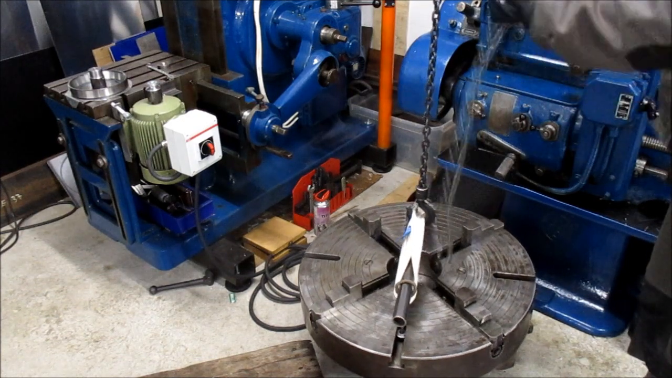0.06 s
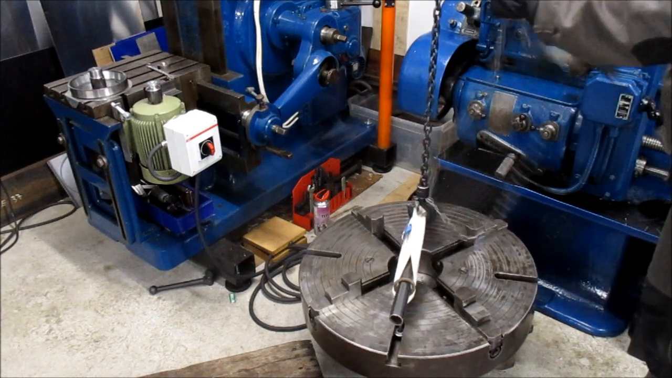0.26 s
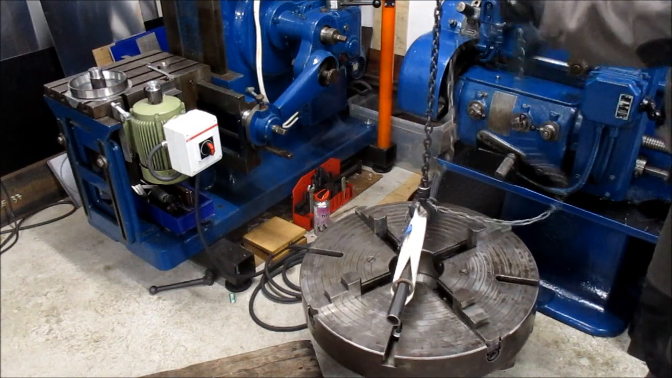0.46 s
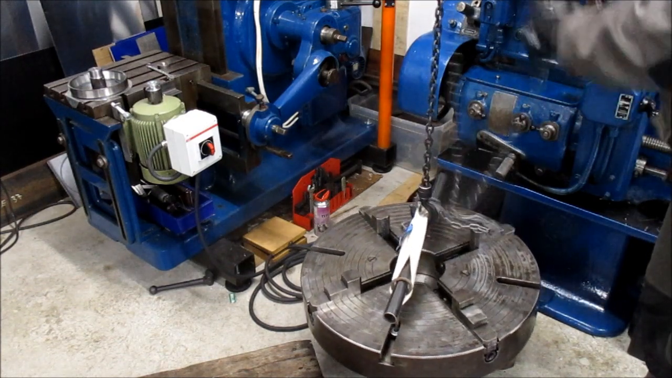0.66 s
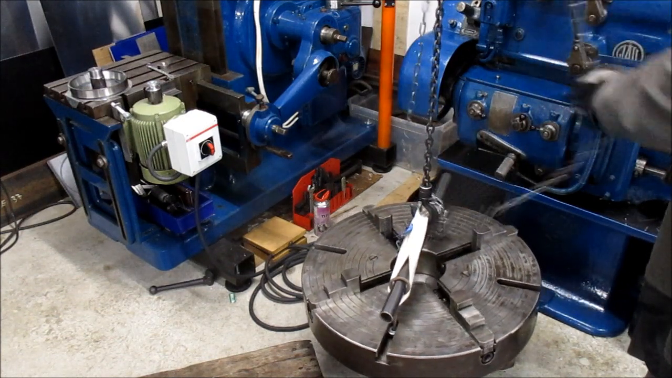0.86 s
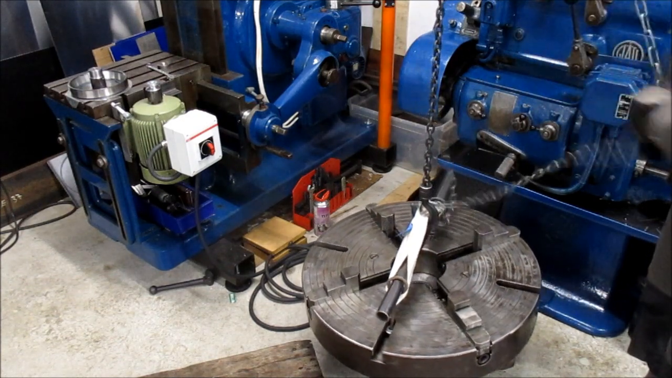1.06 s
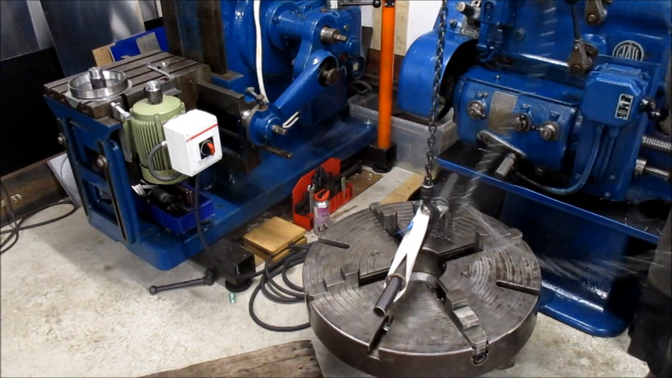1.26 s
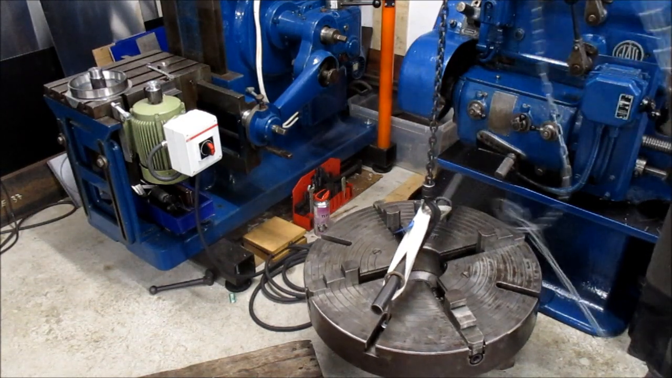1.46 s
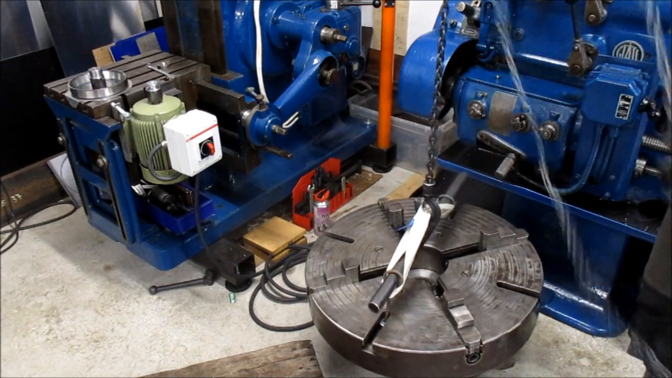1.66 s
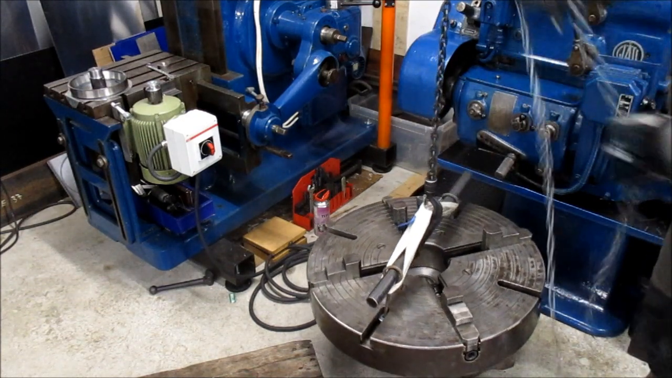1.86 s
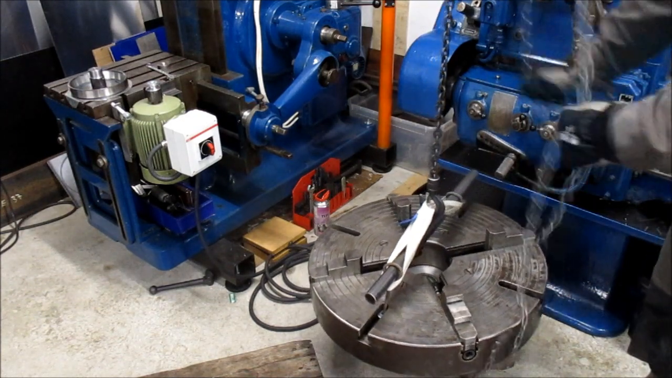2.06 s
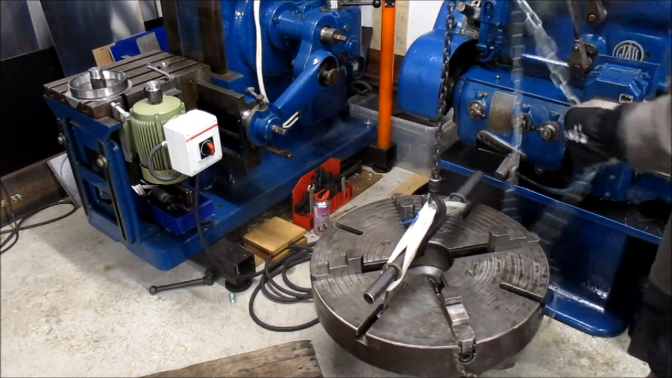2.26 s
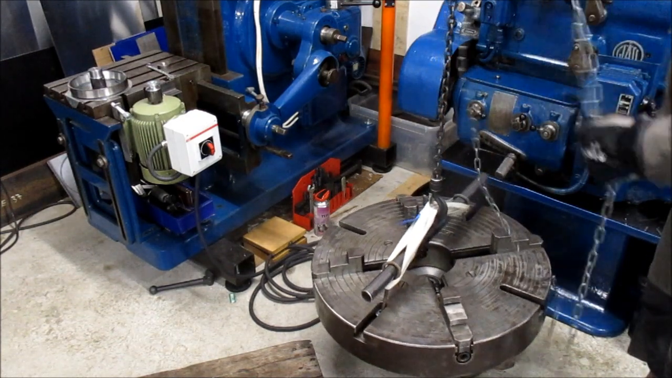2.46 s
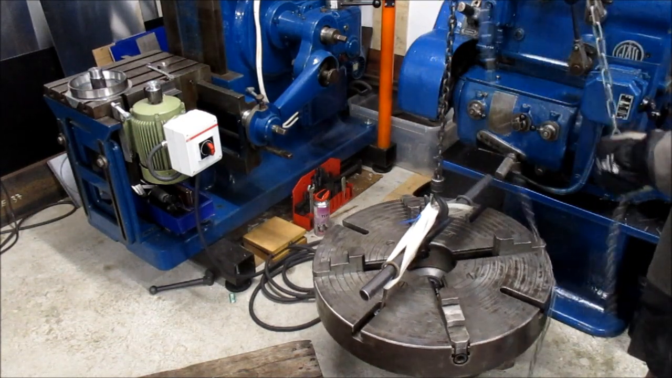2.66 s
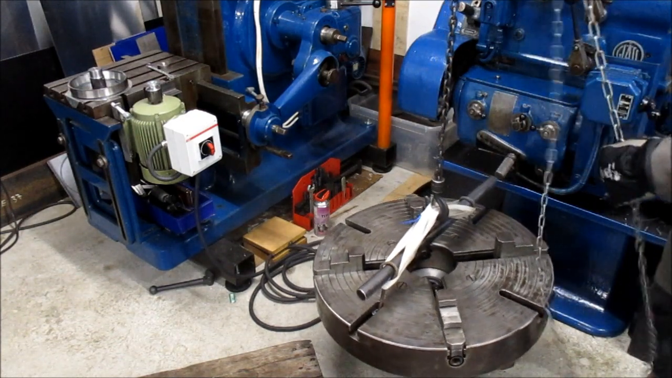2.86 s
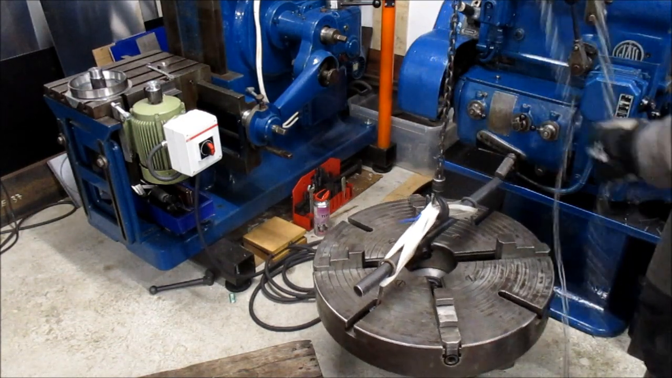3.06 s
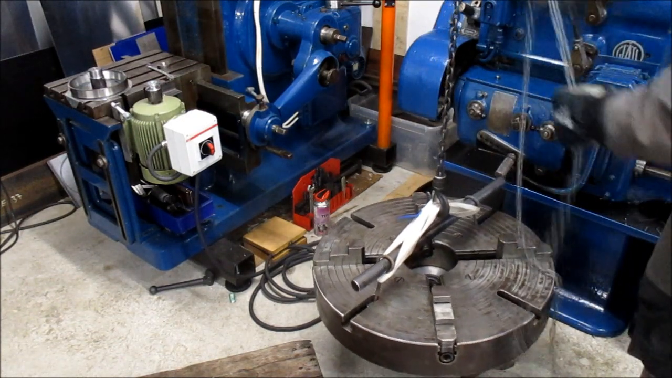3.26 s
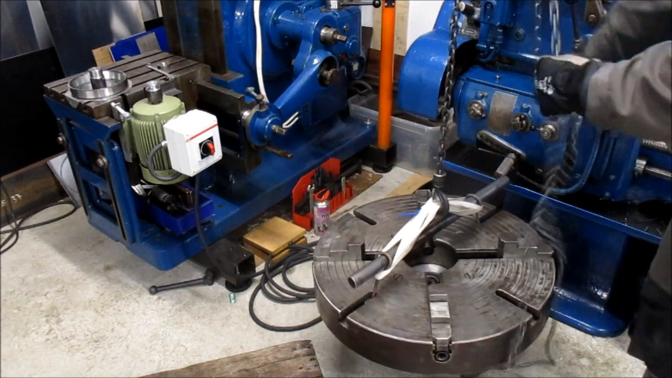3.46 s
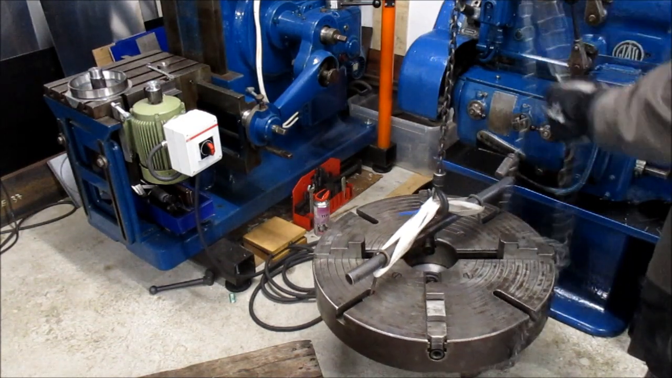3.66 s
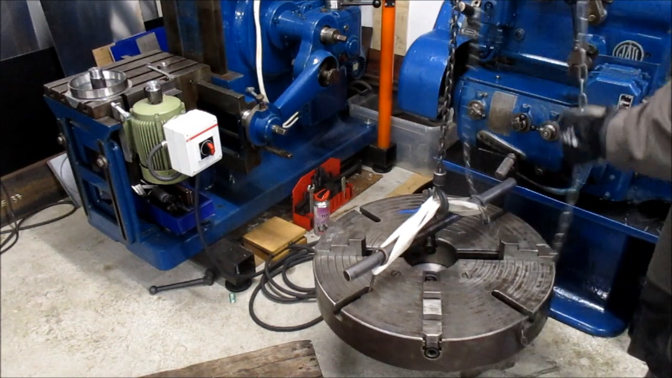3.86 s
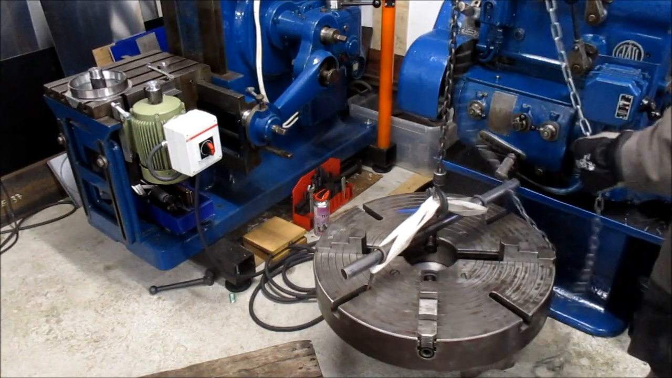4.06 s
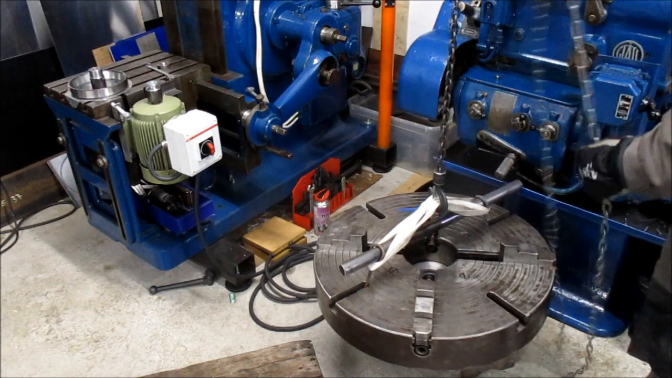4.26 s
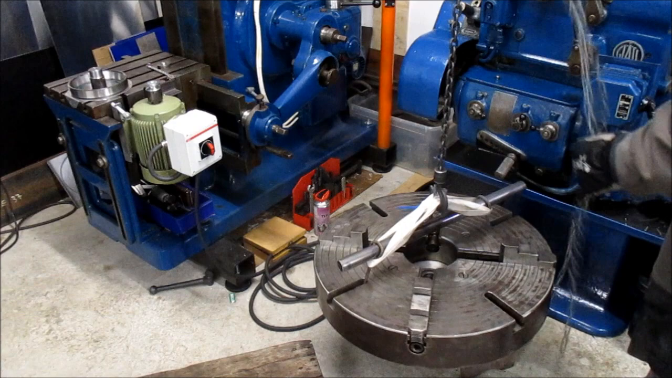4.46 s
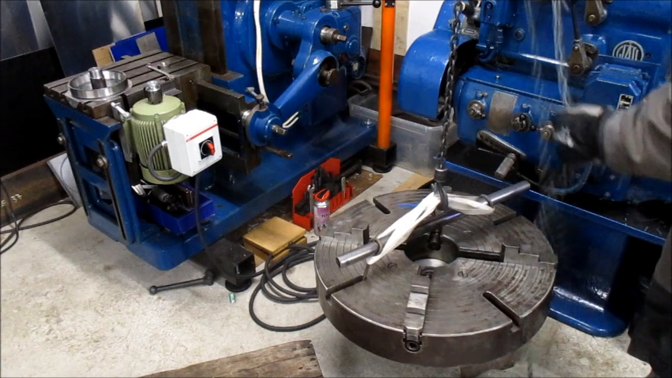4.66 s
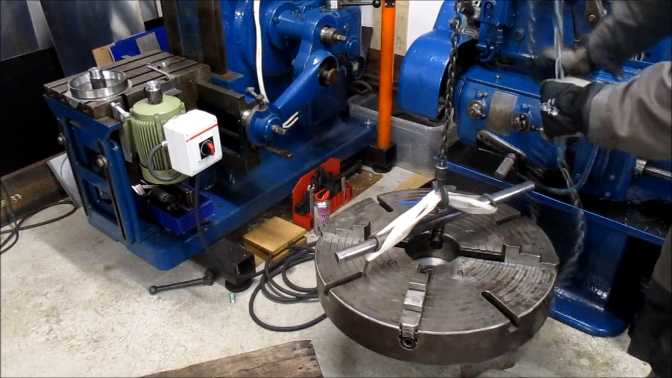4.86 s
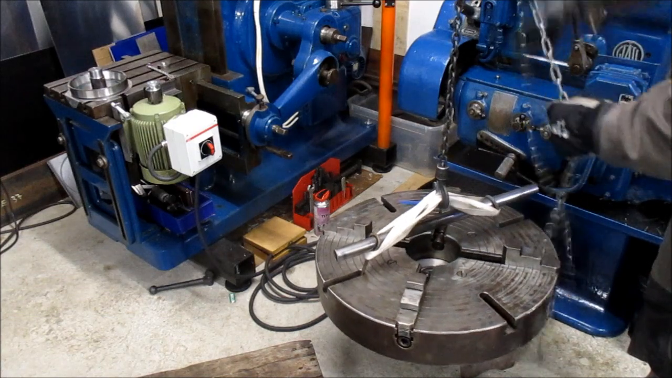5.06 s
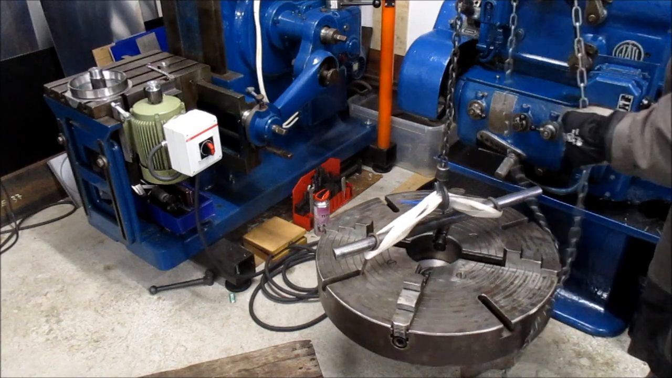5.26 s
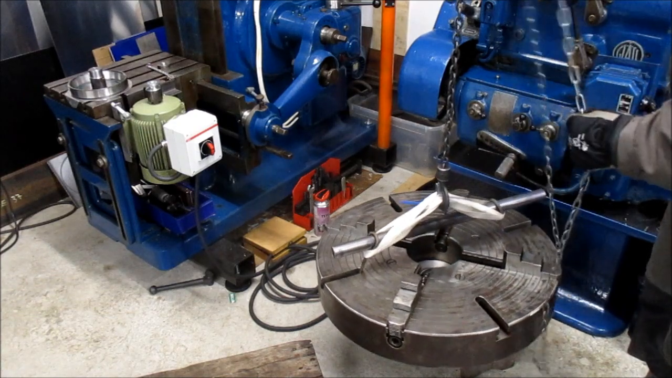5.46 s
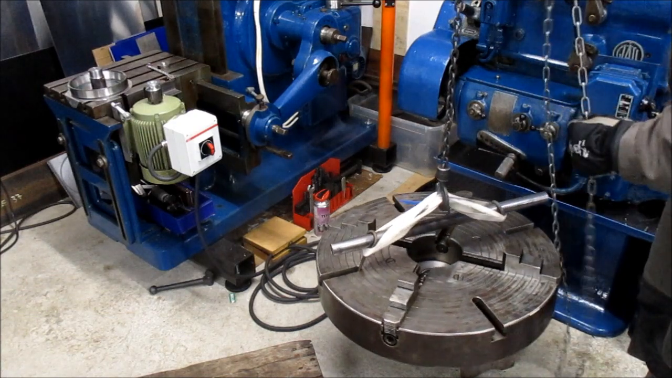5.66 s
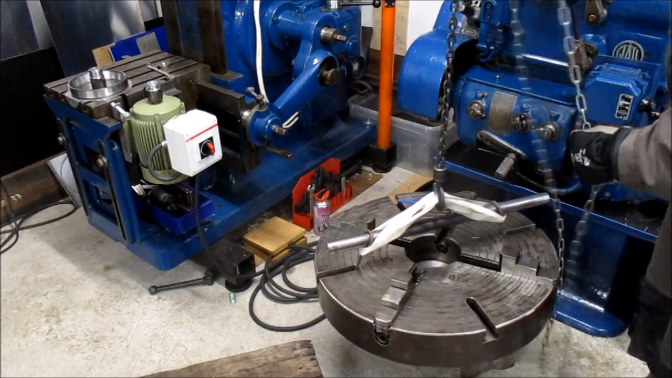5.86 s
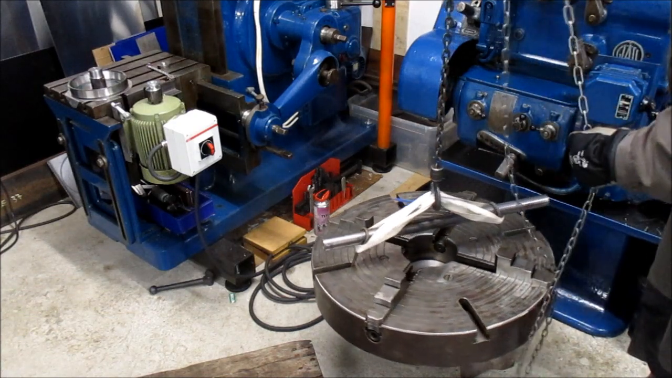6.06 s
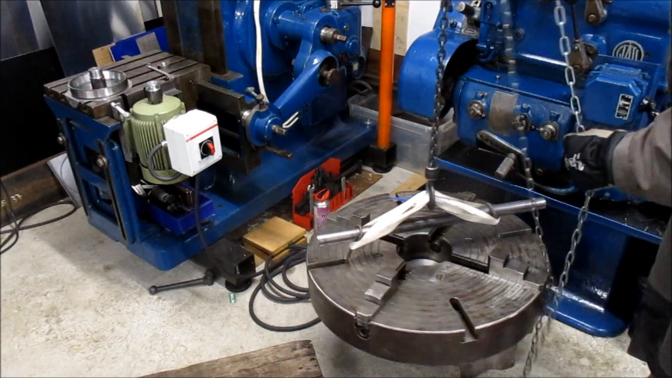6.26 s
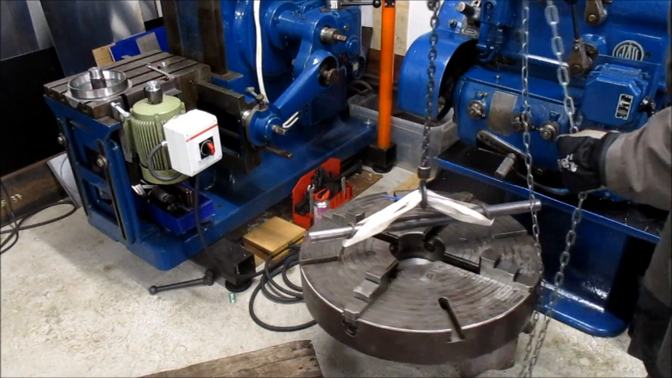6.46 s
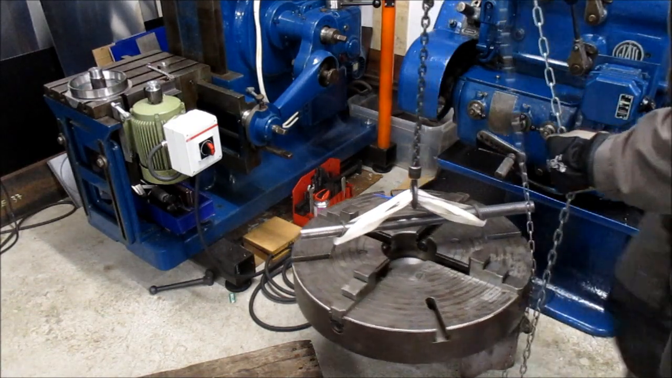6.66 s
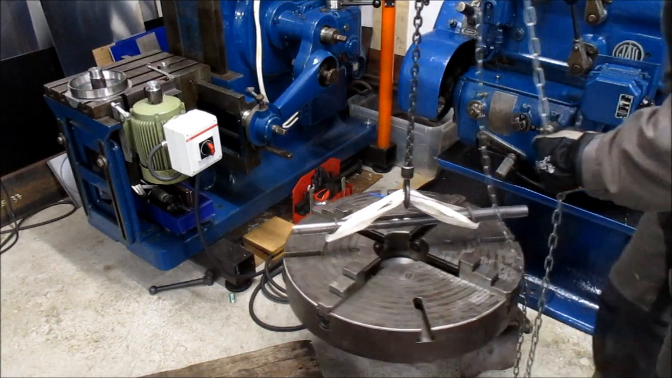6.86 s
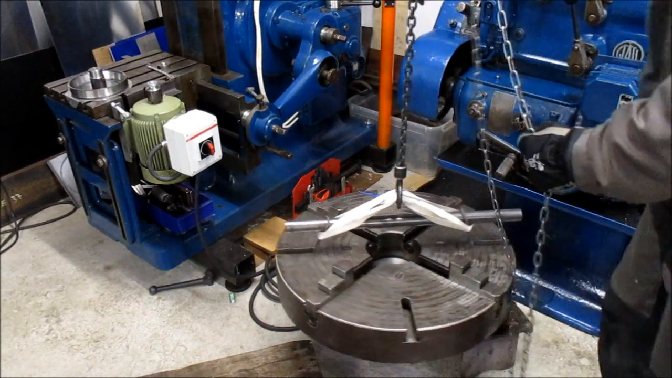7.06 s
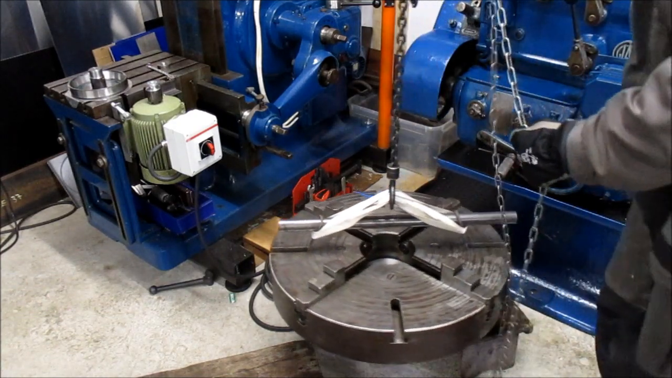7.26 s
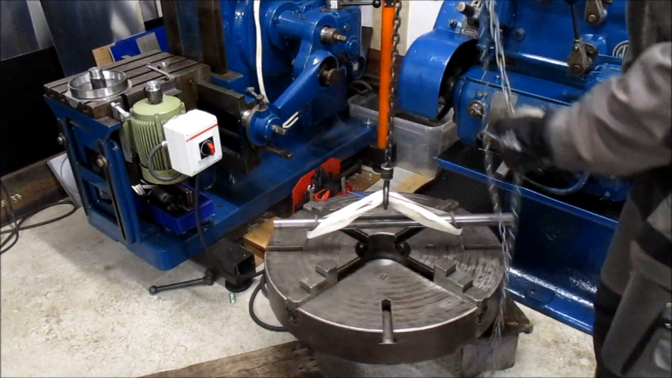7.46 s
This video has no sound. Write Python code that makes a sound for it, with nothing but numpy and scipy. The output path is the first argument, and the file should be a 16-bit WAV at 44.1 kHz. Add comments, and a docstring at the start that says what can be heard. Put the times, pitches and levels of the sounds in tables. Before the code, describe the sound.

In a hard-walled workshop, a chain hoist is worked by hand. A rattling pull is already under way, then slack links jingle, the chain clanks on its steel housing and twice chimes on a bar. Several more clattering pulls follow, separated by ticks, snaps and fading jingles. A quieter lull of small clicks ends in a hard clank and another pull. One microphone, identical in both channels, with low air murmur.

```python
"""A chain hoist is hauled hand over hand in a workshop, heard by one microphone in a hard-walled room with a low murmur of air.
A pull is already under way at the start: chain contacts ring the steel housing while the slack hand chain jingles very high.
The chain slaps the housing, the load knocks, links tick, then the chain twice strikes a steel bar and the hook rings.
Four more full pulls and one slight tug follow, the last at the end, amid sharp snaps, two pings and more clanks.
Random contact forces drive decaying resonances; most sounds carry a diffuse echo whose treble dies first."""
import sys
import numpy as np
from scipy import signal
from scipy.fft import rfft, irfft
from scipy.io import wavfile
from scipy.ndimage import uniform_filter1d

SR = 44100
rng = np.random.default_rng(int(sys.argv[2]) if len(sys.argv) > 2 else 0)


def file_out(sig):
    """Save sig as 16-bit WAV at sys.argv[1]."""
    # one column per channel
    cols = np.atleast_2d(sig).T
    # limit, then scale
    lim = np.clip(cols, -1, 1)
    pcm = np.round(lim * 32767).astype(np.int16)
    wavfile.write(sys.argv[1], SR, pcm)


N = 332073
TIME = np.arange(N) / SR
TAIL = TIME[:SR]  # one second, the length of every response


def undb(db):
    """Decibels to gain."""
    return 10 ** (np.asarray(db) / 20)


def unit(x):
    """Scale a response to unit energy."""
    return x / np.sqrt(np.sum(x ** 2))


def play(force, response):
    """Drive a response with a force, by convolution."""
    return signal.oaconvolve(force, response)[:N]


def at_hz(points, hz):
    """Read (Hz, value) points on a log-frequency axis."""
    point_hz, value = np.transpose(points)
    return np.interp(np.log(hz + 1), np.log(point_hz), value)


def colour(x, points):
    """Filter causally to a (Hz, dB) shape, using the minimum phase found from its cepstrum."""
    n = len(x)
    log_gain = np.log(undb(at_hz(points, np.fft.rfftfreq(n, 1 / SR))))
    cepstrum = irfft(log_gain, n)
    # fold the negative times onto the positive ones
    cepstrum[1:n // 2] *= 2
    cepstrum[n // 2 + 1:] = 0
    return irfft(rfft(x) * np.exp(rfft(cepstrum)), n)


def below(x, hz):
    """The part of a sound under a frequency, without phase shift."""
    lowpass = signal.butter(2, min(hz, .45 * SR), fs=SR, output="sos")
    return signal.sosfiltfilt(lowpass, x, padtype=None)


def shelve_low(x, hz, gain_db):
    """Raise or lower the part of a sound under a frequency."""
    return x + (undb(gain_db) - 1) * below(x, hz)


def fade(t60):
    """Exponential decay by 60 dB in t60 seconds."""
    return np.exp(-np.log(1000) * TAIL / t60)


def crack(t60):
    """The brief noisy chatter of one contact: decaying white noise."""
    return unit(rng.standard_normal(SR) * fade(t60))


def ring(modes, scatter_db=2, detune=0):
    """Decaying sine modes as struck at one random spot, with scattered levels, signs and pitches."""
    chance = rng.standard_normal((len(modes), 3))
    total = 0
    for (hz, db, t60), (level, sign, pitch) in zip(modes, chance):
        gain = undb(db + scatter_db * level) * np.sign(sign)
        tone = np.sin(2 * np.pi * hz * (1 + detune * pitch) * TAIL)
        total = total + gain * fade(t60) * tone
    return unit(total)


def in_room(response, wet_db):
    """Add the diffuse workshop echo: noise decaying at its own speed in each band, treble first."""
    # workshop reverberation: pitch_hz, t60_s
    reverb_times = [(150, 0.53), (1000, 0.69), (3000, 0.66), (7000, 0.54), (15000, 0.31)]
    hz, _, cells = signal.stft(rng.standard_normal(SR), SR, nperseg=256)
    age = np.linspace(0, 1, cells.shape[1])
    decay = np.exp(-np.log(1000) * age / at_hz(reverb_times, hz)[:, None])
    tail = signal.istft(cells * decay)[1][:SR]
    tail = unit(tail * (1 - fade(0.006)))  # the echo swells in just after the direct sound
    return unit(response + undb(wet_db) * signal.fftconvolve(response, tail)[:SR])


def impacts(rate, spread_db, size=1500):
    """Random contacts (per s) of unequal force and either sign, local power evened over size samples."""
    struck = rng.random(N) < rate / SR
    hits = struck * undb(spread_db * rng.standard_normal(N)) * rng.choice([-1, 1], N)
    power = np.abs(uniform_filter1d(hits ** 2, size))
    return hits / np.sqrt(power + 0.97 * rate / SR)


def add(out, s, db, sound):
    """Mix in one event at its start, scaled by its loudest 200-sample RMS."""
    start = max(int(s * SR), 0)
    part = sound[:N - start]
    loudest = np.sqrt(uniform_filter1d(sound ** 2, size=200).max())
    out[start:start + len(part)] += undb(db) * part / loudest


def room_air():
    """Low steady murmur of the workshop air: noise weighted to the bass."""
    # spectrum of the still room: pitch_hz, relative_db
    air_shape = [(15, -32), (25, -19), (62, -8), (85, -13.5), (150, -10), (400, -9.5), (700, -8.5),
                 (1100, -14.5), (3000, -22), (13000, -33.5)]
    level_db = -55  # RMS ahead of the recorder
    air = colour(rng.standard_normal(N), air_shape)
    return undb(level_db) * air / air.std()


def stroke(start, length, db, sag_db, slowing):
    """Force of one pull: the wheel spins up, the arm sags or swells, then it coasts while the chain settles."""
    # the wheel takes up the slack, then gathers speed
    take_up_db_per_s, spin_up_db, spin_up_s = 526, 7.5, 0.066
    # after the wheel stops the chain goes on rattling faintly
    settle_db, settle_db_per_s = -21.5, 27
    age = TIME - start
    early, late = np.maximum(-age, 0), np.maximum(age - length, 0)
    spin_db = -spin_up_db * np.clip(1 - age / spin_up_s, 0, 1) - take_up_db_per_s * early
    arm_db = -sag_db * np.sin(np.pi * np.clip(age / length, 0, 1) ** 2) ** 2
    coast_db = np.maximum(-slowing * late, settle_db - settle_db_per_s * late)
    return undb(db + spin_db + arm_db + coast_db)


def housing(ring_db, chatter_t60, wet_db):
    """One blow on the hoist: a contact crack and the ringing steel."""
    # hoist housing modes: pitch_hz, relative_db, t60_s
    housing_modes = [(319.6, -11, 0.22), (414, -14.5, 0.64), (749.5, 0, 0.31), (929.4, -3, 0.28),
                     (1147, -5, 0.13), (2396, 8.5, 0.11), (2576, -4.5, 0.19), (2678, 3.5, 0.13),
                     (3003, -3.5, 0.27), (3240, 3, 0.083), (4213, 2.5, 0.094), (4940, -7, 0.16),
                     (5330, 5, 0.12), (6075, 0, 0.15), (6720, -2, 0.23), (7400, -7, 0.28), (8550, 5, 0.14),
                     (9000, -10, 0.2), (9734, -3, 0.24)]
    # dense short-lived resonances of chain and housing: pitch_hz, relative_db
    clatter_shape = [(35, -40), (70, -53), (160, -9.5), (350, -10), (480, -9.5), (700, 1), (950, -4),
                     (1150, -1), (1450, -1), (2000, -4), (2600, 0), (3700, -4.5), (4700, -5.5), (5500, 3),
                     (7400, -4), (9500, -2), (12000, -2.5), (15500, -13.5)]
    contact = unit(colour(crack(chatter_t60), clatter_shape))
    return in_room(contact + undb(ring_db) * ring(housing_modes), wet_db)


def clinking(force, count=8):
    """Heavy running links clink on one another, apart from the clatter, each link with its own pitch."""
    # heavy link modes: pitch_hz, relative_db, t60_s
    clink_modes = [(2507, -2, 0.052), (3137, -6, 0.07), (5450, 8.5, 0.056), (6037, 0, 0.037)]
    out = 0
    for _ in range(count):
        link = ring(clink_modes, scatter_db=9, detune=0.039) + undb(-13) * crack(0.0032)
        contacts = impacts(7, spread_db=4, size=12000)  # 7 per s for each link
        out = out + play(force * contacts, in_room(link, wet_db=-3.5))
    return undb(-5.5) * out / np.sqrt(count)


def hauling(count=5):
    """Links hit wheel, guide and housing at several spots, more often the harder the pull, and clink."""
    # pulls on the hand chain: start_s, length_s, force_db (relative),
    # sag_db (mid-stroke, negative swells), slowing_db_per_s (after release)
    pulls = [(-0.27, 0.47, -14, -1.5, 130.5), (1.472, 0.48, -12.5, 7, 109), (2.89, 0.43, -13.5, 3, 113),
             (4.198, 0.027, -31, -6, 103), (4.318, 0.42, -15, 1.5, 96.5), (7.418, 0.57, -17, 0, 85)]
    force = np.max([stroke(*pull) for pull in pulls], axis=0)
    effort = force / force.max()
    # low body at full speed is -2 dB; it gains weight as force is lost, down to the -21.5 dB floor
    lost_db = -20 * np.log10(np.maximum(effort, undb(-21.5)))
    weight_db = -2 + 0.236 * lost_db
    rate = 40 + 150 * np.sqrt(effort)  # contacts per s at each spot
    out = 0
    for _ in range(count):
        spot = housing(ring_db=-6.5, chatter_t60=0.0045, wet_db=-1.0)
        out = out + play(force * impacts(rate, spread_db=1.5), spot)
    clatter = shelve_low(out, 1700, weight_db)
    return undb(1.0) * clatter / np.sqrt(count) + clinking(force)


def jingling(count=4):
    """Small links of the slack chain touch: a faint click and a very high ring, each a little different."""
    # shakes of the slack hand chain: start_s, length_s, force_db (relative)
    shakes = [(0.0, 0.98, -28.5), (0.257, 0.045, -24), (0.494, 0.095, -20.5), (0.688, 0.43, -29),
              (0.826, 0.03, -26), (1.206, 0.11, -25.5), (1.5, 0.18, -48), (1.848, 0.15, -28),
              (2.134, 0.086, -18.5), (2.277, 0.081, -35), (2.538, 0.037, -41), (2.817, 0.09, -47),
              (2.9, 0.28, -36), (3.236, 0.08, -24.5), (3.59, 0.047, -27.5), (3.833, 0.024, -39),
              (4.04, 0.2, -42), (4.19, 0.085, -36), (4.4, 0.38, -32), (5.052, 0.02, -31),
              (5.102, 0.02, -24.5), (5.491, 0.012, -26), (5.658, 0.035, -34.5), (5.98, 0.025, -38),
              (6.135, 0.03, -35.5), (6.382, 0.025, -41), (6.57, 0.022, -48), (7.23, 0.031, -48)]
    # hand-chain link modes: pitch_hz, relative_db, t60_s
    link_modes = [(14480, -3, 0.07), (14640, -4, 0.07), (14930, 0, 0.07), (15030, -2, 0.06),
                  (15600, -6, 0.036)]
    rise_db_per_s, fall_db_per_s = 1500, 210  # a shake swells, holds and dies away
    levels = []
    for s, length, db in shakes:
        rise_db = rise_db_per_s * np.maximum(s - TIME, 0)
        fall_db = fall_db_per_s * np.maximum(TIME - s - length, 0)
        levels.append(db - rise_db - fall_db)
    force = undb(np.max(levels, axis=0))
    out = 0
    for _ in range(count):
        link = ring(link_modes, detune=0.004) + undb(-12) * crack(0.008)
        touches = impacts(160, spread_db=2)  # 160 per s for each link
        out = out + play(force * touches, in_room(link, wet_db=-4))
    return undb(-1.5) * out / np.sqrt(count)


def clanks():
    """The chain slaps the housing as a pull starts or the slack swings back."""
    # single blows: start_s, level_db (loudest short RMS), low_body_db, treble_db (both tone changes)
    blows = [(0.364, -21, 1, 2.5), (0.587, -29.5, 2, 5.5), (0.809, -44.5, 18, 14), (1.473, -18, -12, -1),
             (2.347, -32, -4, 1), (2.421, -27.5, -2.5, -13), (2.55, -36.5, 3, -10), (2.85, -27, -1.5, -2),
             (2.88, -21.5, 1, 29), (3.459, -27, 13, -1), (3.533, -25, -7, -3), (3.69, -33.5, -1, -3),
             (3.769, -30, -1.5, -11), (4.033, -30, -3.5, 0.5), (4.211, -34, 4.5, -11),
             (4.304, -19, -3.5, 3), (5.173, -36, 5, -3), (5.502, -38.5, -1.5, -5), (5.901, -46, -10, -13),
             (6.274, -47.5, -18, -17), (6.665, -45.5, 3, -18), (6.971, -36, 4, -4.5),
             (7.12, -40.5, 8.5, -1), (7.219, -31.5, 3.5, -2.5), (7.424, -15, -1, 5)]
    out = np.zeros(N)
    for s, db, low_db, treble_db in blows:
        blow = housing(ring_db=-5.0, chatter_t60=0.065, wet_db=4)
        blow = shelve_low(blow, 1600, low_db)
        treble = blow - below(blow, hz=6300)
        add(out, s, db, blow + (undb(treble_db) - 1) * treble)
    return out


def load_knocks():
    """The hanging load knocks dully: low modes and a dark contact noise."""
    # knocks: start_s, level_db (loudest short RMS), bass_db (tone change)
    knocks = [(0.364, -30, -23), (3.459, -36, -7), (4.25, -46, -8), (6.826, -32, -1.5)]
    # hanging load modes: pitch_hz, relative_db, t60_s
    load_modes = [(157, -2, 0.2), (255, -4, 0.17), (306, 0.5, 0.23), (444, -12, 0.08), (698, -2, 0.2),
                  (1557, -11, 0.15)]
    # contact noise of a knock: pitch_hz, relative_db
    thud_shape = [(60, -6), (150, -2.5), (300, 1.5), (700, -7.5), (1600, -14.5), (3500, -22.5),
                  (12000, -45)]
    out = np.zeros(N)
    for s, db, bass_db in knocks:
        thud = unit(colour(crack(0.058), thud_shape))
        knock = in_room(ring(load_modes) + undb(7.0) * thud, wet_db=7.0)
        add(out, s, db, shelve_low(knock, 217, bass_db))
    return out


def seat_ticks():
    """Load-chain links slip into their seats: very short rings with a tiny crack."""
    # ticks: start_s, level_db (loudest short RMS)
    ticks = [(0.466, -28.5), (1.346, -40), (2.722, -46), (3.555, -26), (3.772, -26), (4.095, -31),
             (4.174, -34), (5.313, -41.5), (5.402, -43), (5.478, -37), (6.096, -36.5), (6.353, -40),
             (6.751, -42.5), (6.887, -48.5), (6.952, -36), (7.015, -40), (7.359, -38.5)]
    # load-chain link modes: pitch_hz, relative_db, t60_s
    seat_modes = [(5380, 3, 0.016), (5520, -4, 0.025), (5953, 11, 0.03), (6400, -8.5, 0.0196)]
    out = np.zeros(N)
    for s, db in ticks:
        tick = ring(seat_modes, detune=0.018) + undb(-10.5) * crack(0.0031)
        add(out, s, db, in_room(tick, wet_db=1))
    return out


def bar_chimes():
    """The chain strikes the steel bar: modes that die faster at first, with a noisy contact."""
    # strikes: start_s, level_db (loudest short RMS)
    strikes = [(0.9649, -25), (1.1654, -27)]
    # steel bar modes: pitch_hz, relative_db, t60_s
    bar_modes = [(2347, -11.5, 0.2), (3590, -6, 0.14), (7746, 0, 0.2), (8060, 0.5, 0.19), (8670, -4, 0.14),
                 (9560, -10, 0.18)]
    out = np.zeros(N)
    for s, db in strikes:
        bar = ring(bar_modes) * (1 + 4.7 * fade(0.08))
        add(out, s, db, in_room(bar + undb(5.0) * crack(0.1), wet_db=-1))
    return out


def hook_rings():
    """The hook shifts and rings on its own modes."""
    # taps: start_s, level_db (loudest short RMS)
    taps = [(1.189, -44), (4.121, -41), (5.506, -44)]
    # hook modes: pitch_hz, relative_db, t60_s
    hook_modes = [(1284, -4.5, 0.12), (1445, -15, 0.13), (975, -12, 0.28)]
    out = np.zeros(N)
    for s, db in taps:
        add(out, s, db, in_room(ring(hook_modes), wet_db=2.5))
    return out


def link_snaps():
    """Link snaps on link close by: a very short crack, differenced to lift its treble."""
    # snaps: start_s, level_db (loudest short RMS)
    snaps = [(1.474, -26), (1.6894, -25), (2.5555, -31), (2.7492, -48), (3.838, -25), (5.981, -40),
             (6.6638, -48), (6.972, -35), (7.4622, -19)]
    out = np.zeros(N)
    for s, db in snaps:
        snap = np.diff(crack(0.0028), prepend=0)
        add(out, s, db, in_room(snap, wet_db=-7))
    return out


def link_pings():
    """A loose link rings out freely on two close high modes."""
    # pings: start_s, level_db (loudest short RMS)
    pings = [(2.16, -31), (2.25, -38)]
    # loose link modes: pitch_hz, relative_db, t60_s
    loose_modes = [(11720, 0, 0.3), (11650, 0, 0.15)]
    out = np.zeros(N)
    for s, db in pings:
        add(out, s, db, in_room(ring(loose_modes), wet_db=0))
    return out


def scene():
    """Everything reaches one microphone, copied to both channels."""
    chain = hauling() + jingling() + clanks()
    small_hits = load_knocks() + seat_ticks() + bar_chimes() + hook_rings() + link_snaps() + link_pings()
    mono = room_air() + chain + small_hits
    return np.array([mono, mono])


def record(dry):
    """The recorder rounds the highest peaks and cuts the top above 15.8 kHz."""
    rounded = np.tanh(.6 * dry) / 0.58
    top_cut = signal.ellip(10, .2, 80, 15800, fs=SR, output="sos")
    return signal.sosfilt(top_cut, rounded)


dry = scene()
out = record(dry)
file_out(out)
```